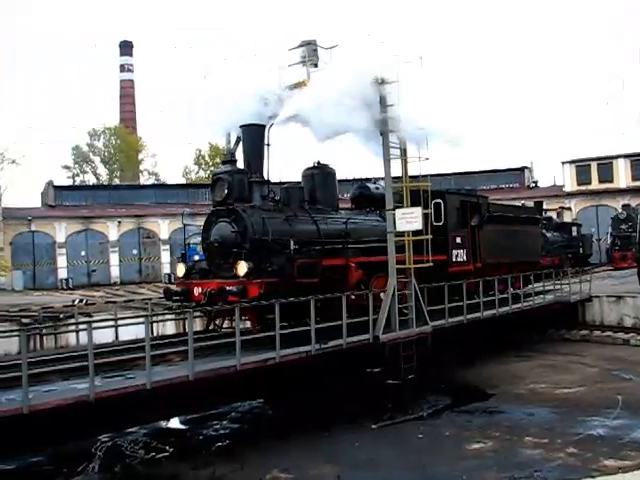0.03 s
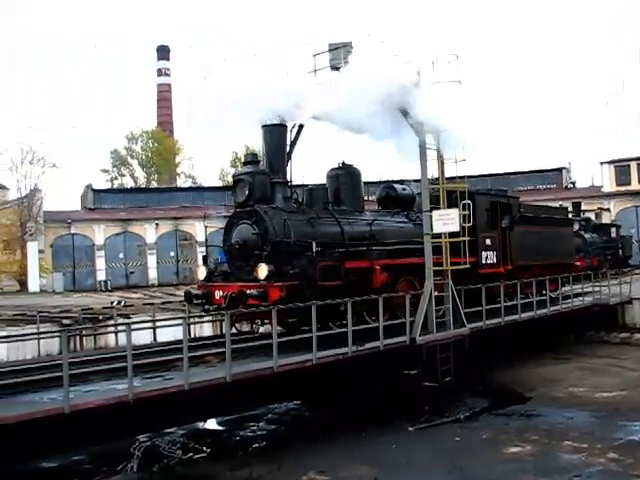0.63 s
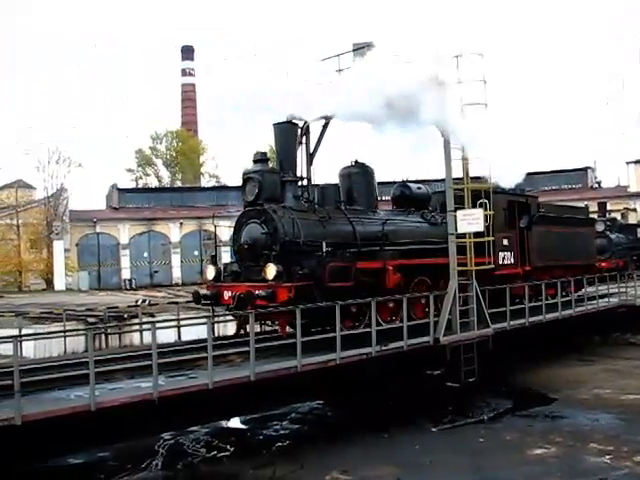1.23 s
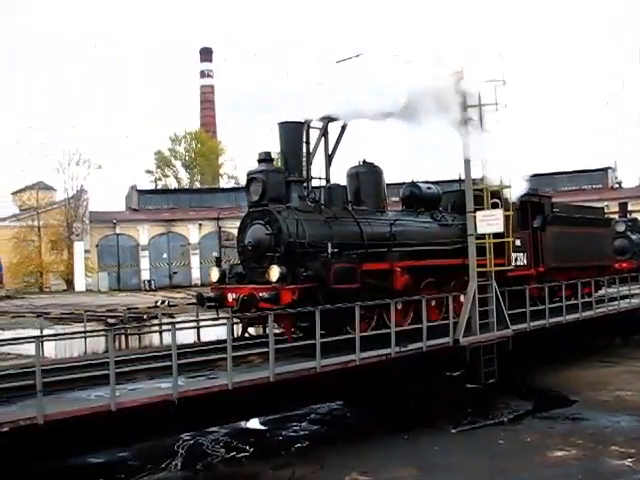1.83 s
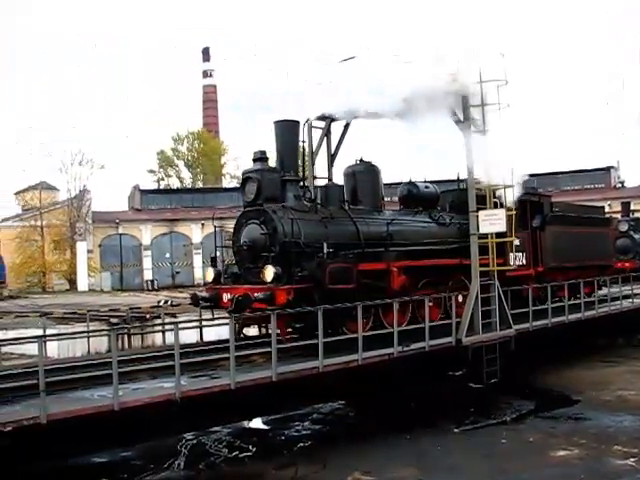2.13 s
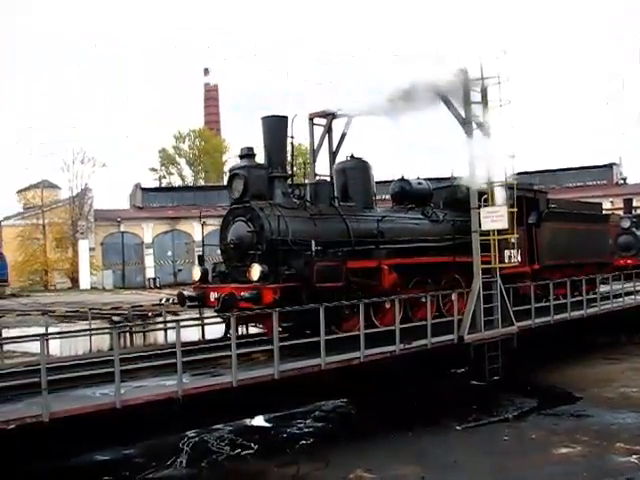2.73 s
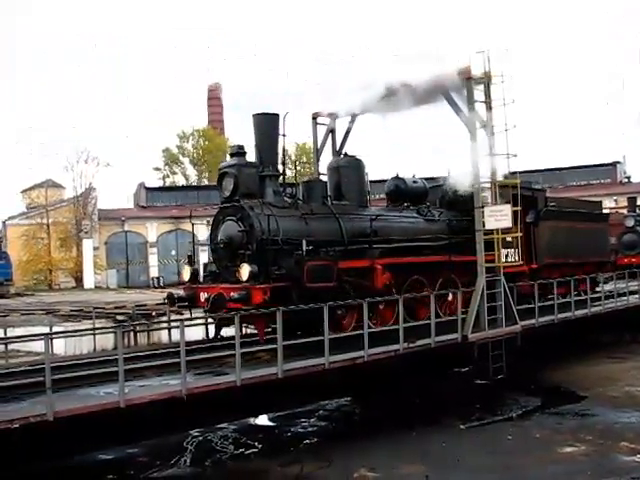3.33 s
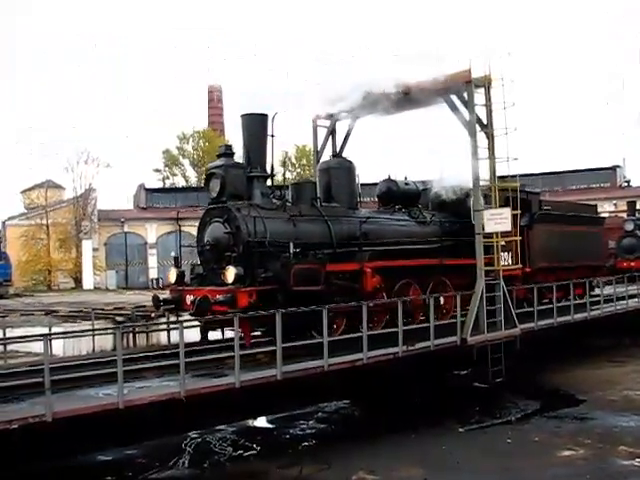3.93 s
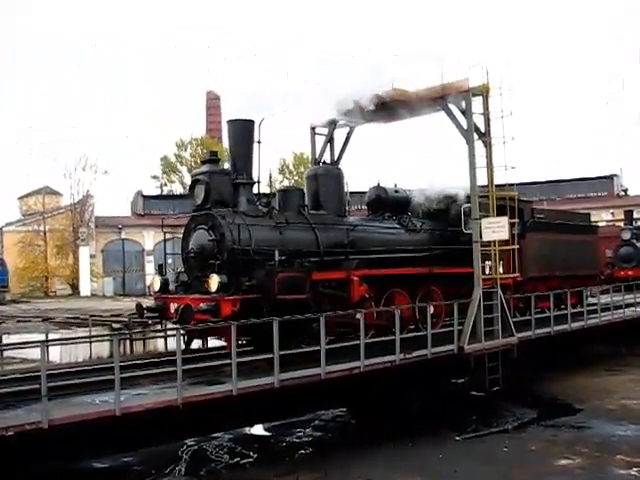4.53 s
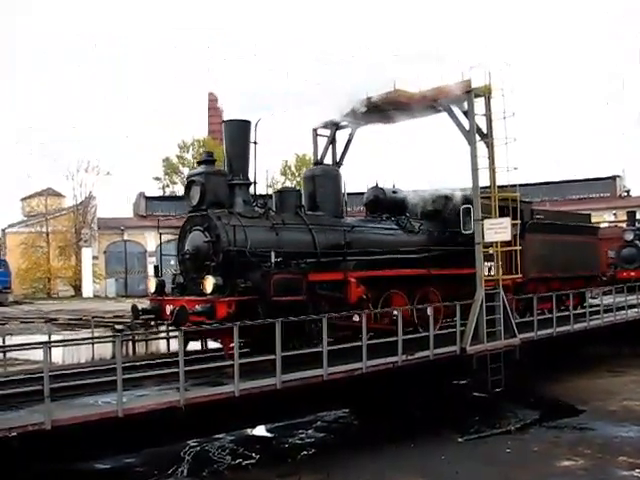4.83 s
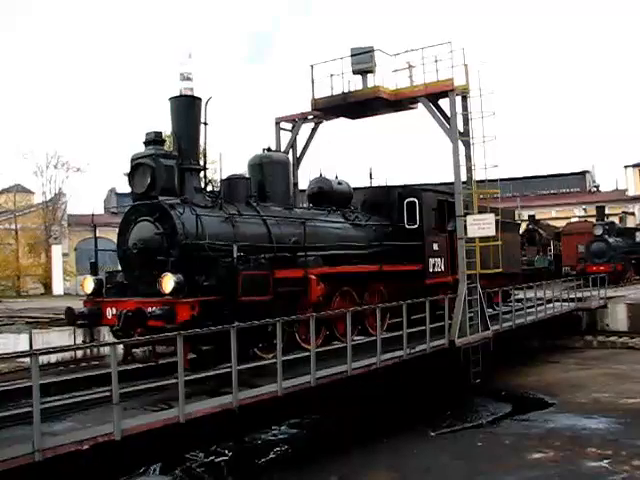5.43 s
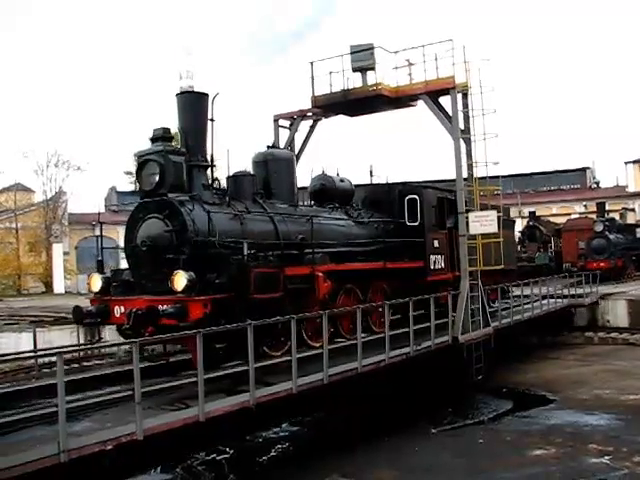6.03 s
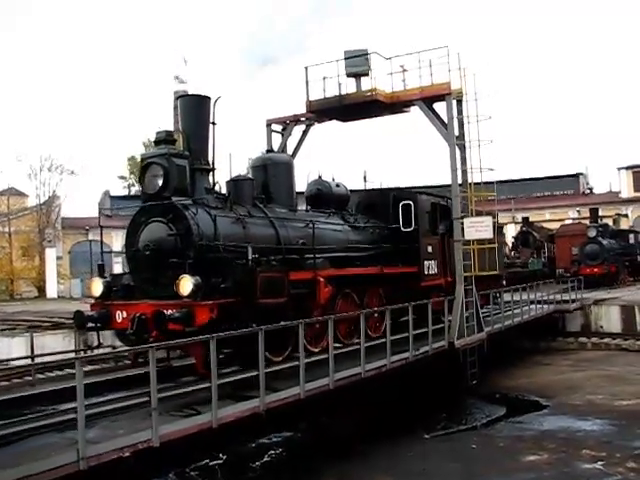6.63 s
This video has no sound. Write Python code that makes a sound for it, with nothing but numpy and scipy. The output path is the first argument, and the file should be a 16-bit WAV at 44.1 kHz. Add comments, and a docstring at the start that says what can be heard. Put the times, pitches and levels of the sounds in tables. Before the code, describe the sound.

A steam locomotive moves slowly outdoors, some thirty metres away, with a steady bright hiss and a low rumble throughout. Soft swells of steam open the scene. Loud blasts of wet steam, each about a third of a second long, come at 1.5, 2.4, 4.0, 4.9, 5.8 and 6.6 seconds. Most begin with a pop and trail off quickly, and the background dips under each, then recovers. Gentler swells fall between them. A faint breathy whistle, sinking slightly in pitch, appears around 1 second and again from 2.6 to 4.4 seconds. At about 5.3 seconds the sound cuts to silence for an instant. It returns much nearer, with stronger hiss and rumble, and the turntable girders give two low, wavering groans, at about 5.4 and 6.1 seconds. The sound ends just as the last blast starts.

```python
"""A steady hiss of leaking steam and a low rumble: a locomotive creeps onto a turntable some 30 m off.
Its open cylinder cocks blow in turn, each with an echo off the ground: the near ones weep, burst out
with a pop and drain; the far ones swell softly and whistle. The bridge groans under the wheels.
Gain control on the microphone pair ducks the hiss and rumble at every blast.
Late on the sound cuts out for a moment, and after that the engine is much nearer."""
import sys
import numpy as np
from scipy import signal
from scipy.fft import rfft, irfft
from scipy.io import wavfile
from scipy.ndimage import uniform_filter1d

SR = 44100
rng = np.random.default_rng(int(sys.argv[2]) if len(sys.argv) > 2 else 0)


def dump(signal):
    """Clip the signal to [-1, 1] and save it as 16-bit WAV at the path in sys.argv[1]."""
    limited = np.clip(np.atleast_2d(signal).T, -1, 1)
    pcm = np.round(limited * 32767).astype(np.int16)
    wavfile.write(sys.argv[1], SR, pcm)


N = 294588
T = np.arange(N) / SR
HZ = np.fft.rfftfreq(N, 1 / SR)

# blasts of the near cocks: t/s, level/dB, length/s, pressure fall/(dB/s), pop level/dB, opening time/s
BLASTS = [(1.456, -8.5, 0.34, 33, -24, .003), (2.4334, -7.5, 0.37, 40, -10, 0.0006),
          (3.952, -7, 0.33, 34, -13, 0.0008), (4.8888, -6.5, 0.34, 35.5, -11, .0012),
          (5.817, -3.5, 0.32, 43, -11, 0.0007), (6.624, -5, 0.43, 27, -10, .0005)]


def amp(db):
    """Decibels to gain."""
    return 10 ** (np.asarray(db) / 20)


def unit(x):
    """Scales to rms 1."""
    return x / np.sqrt(np.mean(x ** 2) + 1e-20)


def over_frequency(points):
    """A spectrum table at every frequency, joined up on a log axis."""
    hz, value = np.transpose(points)
    return np.interp(np.log(HZ + 1), np.log(hz + 1), value)


def over_time(points):
    """A curve table at every sample."""
    return np.interp(T, *np.transpose(points))


def bumps(modes):
    """Bell-shaped peaks and dips over frequency."""
    return sum(height / (1 + (2 * (HZ - hz) / width) ** 2) for hz, width, height in modes)


def swell(start, length, fade_s):
    """A smooth rise, a hold and a smooth fall, 0-1."""
    return np.sin(np.pi / 2 * np.clip(np.minimum(T - start, start + length - T) / fade_s, 0, 1))


def lag(x, seconds):
    """One-pole smoothing."""
    pole = np.exp(-1 / (seconds * SR))
    return signal.lfilter([1 - pole], [1, -pole], x)


def delayed(x, seconds):
    """Each channel heard later by a steady or moving delay."""
    return np.array([np.interp(T - seconds, T, side) for side in x])


def wander(rate_hz, size=4096):
    """Smooth random drift of rms 1, rolling off above the rate."""
    hz = np.fft.rfftfreq(size, T[-1] / size)
    slow = irfft(rfft(rng.standard_normal(size)) * np.exp(-(hz / rate_hz) ** 2) * (hz > 1), size)
    return np.interp(T, np.linspace(0, T[-1], size), unit(slow))


def fuzzy_tone(hz, width_hz):
    """A resonance driven by noise, at a steady or moving pitch."""
    drive = wander(width_hz) + 1j * wander(width_hz)
    phase = 2 * np.pi * np.cumsum(np.broadcast_to(hz, N)) / SR
    return unit((drive * np.exp(1j * phase)).real)


def turbulence(patchy_db, patch_hz, patch_s, size=512, hop=128):
    """Two white noises whose level drifts in shared patches of time and pitch."""
    spectra = signal.stft(rng.standard_normal((2, N)), nperseg=size, noverlap=size - hop)[2]
    bins = max(1, round(patch_hz * size / SR))
    frames = max(1, round(patch_s * SR / hop))
    patches = uniform_filter1d(rng.standard_normal(spectra.shape[1:]), bins, axis=0)
    patches = unit(uniform_filter1d(patches, frames, axis=1))
    noises = signal.istft(spectra * amp(patchy_db * patches), nperseg=size, noverlap=size - hop)[1]
    return unit(noises[:, :N])


def spits(per_s, size_db):
    """Sparse clicks of water drops torn out with the steam."""
    return amp(size_db) * (2 * rng.random(N) - 1) * (rng.random(N) < per_s / SR)


def at_microphones(colour_db, first, second):
    """Colours two unrelated noises and shares them between the microphone pair, at rms 1."""
    likeness = [(100, 1.0), (700, 0.96), (1600, 0.73), (2400, 0.84), (3000, 0.51), (6700, 0.95),
                (10000, 0.71), (11200, 0.58), (13300, 0.58)]  # coherence of left and right: f/Hz, likeness/0-1
    tilt = [(100, 0), (900, -1.1), (1500, 2), (2700, -2.5), (4000, 2.5), (5000, -4), (5900, -0.5),
            (7000, -3.5), (9500, -1.5), (10700, -7.5), (11800, -1)]  # balance of the pair: f/Hz, left over right/dB
    lead = [(100, 0.0), (1000, -0.13), (1900, -0.2), (2700, 0.3), (3200, -0.4), (3900, -0.2), (4500, -1.15),
            (5300, 1), (6500, 0.56), (8800, 0.99), (10000, 0.2), (11300, 1.5), (13200, 0.3)]  # phase across the pair: f/Hz, lead of the left/rad
    housing = [(7350, 800, -1), (10420, 1100, 4.5), (11100, 400, -1.5)]  # resonances of the microphone housing: f/Hz, width/Hz, lift/dB
    same = np.clip(over_frequency(likeness), 0, 1)
    tilt_db = over_frequency(tilt)
    left = rfft(first)
    right = (same * left + np.sqrt(1 - same ** 2) * rfft(second)) * np.exp(-1j * over_frequency(lead))
    pair = np.array([left * amp(tilt_db / 2), right * amp(-tilt_db / 2)])
    return unit(irfft(pair * amp(colour_db + bumps(housing)), N))


def nearness(reference_m=24):
    """Gain of the leak and the rumble: one over the distance, 1 at the reference."""
    distance = [(0, 29), (5.26, 22.4), (5.39, 9), (6.68, 15)]  # from engine to microphones: t/s, distance/m
    return reference_m / over_time(distance)


def ground_echo(x):
    """The bounce off the ground lags further behind as the engine comes nearer."""
    echo = [(0, 2.99), (1.65, 3.125), (3.5, 3.185), (5.26, 3.31), (5.39, 3.56), (6.68, 3.64)]  # lag behind the direct sound: t/s, delay/ms
    return delayed(x, over_time(echo) / 1000)


def beamed(steam, front_pan_db=0.7):
    """The colour and direction of the steam shift as the microphones face more of the engine's front."""
    aspect = [(0, 0.2), (3, 0.3), (5.26, 0.98), (5.4, 1), (6.68, 0.9)]  # swing toward the front of the engine: t/s, share/0-1
    beam = [(2760, 85, 0.38), (2974, 230, -0.36), (5400, 290, 0.37), (7050, 940, -0.45)]  # bands the jets beam forward or lose: f/Hz, width/Hz, signed share
    front = over_time(aspect)
    pan_db = front_pan_db * front
    coloured = steam + front * irfft(rfft(steam) * bumps(beam), N)
    return coloured * amp([pan_db / 2, -pan_db / 2])


def bridge(rumble_db=-35, upper_hz=288, upper_db=-4):
    """The wheels shake the turntable: a wide rumble, and girders that groan with two wavering tones."""
    colour = [(15, -20), (28, -7.5), (48, 2.5), (65, -1), (95, -2.5), (150, -2), (280, -2), (370, -5),
              (470, -9.5), (650, -5.5), (1200, -15.5), (3000, -52)]  # spectrum of the rumble: f/Hz, level/dB
    groans = [(.6, 5.8, 179.3, -50.5), (5.25, 0.67, 194, -32.5), (6.05, .75, 223.8, -32)]  # groans of the girders: t/s, length/s, f/Hz, level/dB
    rumble = at_microphones(over_frequency(colour), *rng.standard_normal((2, N)))
    upper = amp(upper_db) * fuzzy_tone(upper_hz, width_hz=28)
    girders = sum(amp(db) * swell(start, length, fade_s=.15) * (fuzzy_tone(hz, width_hz=8) + upper)
                  for start, length, hz, db in groans)
    return rumble * nearness() * amp(rumble_db + .5 * wander(rate_hz=7.1)) + girders


def leak(level_db=-21, spurt_at_s=3.32, spurt_s=0.076, spurt_db=2.4):
    """A thin, bright jet of steam that flutters a little and spurts once."""
    colour = [(100, -27), (600, -10), (1500, -4), (2300, -1.5), (3500, 0.5), (4800, 0.1), (6600, 0),
              (8200, -0.4), (9600, 1.5), (11300, -2), (13300, -6), (15200, -15.5)]  # spectrum of the leak: f/Hz, level/dB
    first, second = turbulence(patchy_db=1.34, patch_hz=700, patch_s=.04)
    hiss = at_microphones(over_frequency(colour), first + spits(per_s=87, size_db=8), second)
    lift_db = spurt_db * swell(spurt_at_s, spurt_s, fade_s=spurt_s / 2)
    return hiss * nearness() * amp(level_db + lift_db + .5 * wander(rate_hz=52))


def whistle(sag_hz_per_s=40):
    """The jet sings on the lip of a far cock now and then, sinking in pitch."""
    whistles = [(.75, 0.46, 1018, -43.5), (2.6, 0.89, 981, -41.5), (3.5, 0.93, 954, -43.5)]  # breathy notes: t/s, length/s, starting f/Hz, level/dB
    notes = np.zeros(N)
    for start, length, hz, db in whistles:
        tone = fuzzy_tone(hz - sag_hz_per_s * (T - start), width_hz=22)
        notes += amp(db) * swell(start, length, fade_s=0.11) * tone
    return notes


def soft_pressure(rise_s=0.053, weep_lead_s=0.12, weep_db=-19.5, drain_db=-14, drain_db_per_s=32):
    """The far cocks swell in turn; the near ones weep before each blast and drain after it."""
    far_strokes = [(-.15, -23, 4), (.33, -22, 26), (.95, -25.5, 10), (2.92, -20, 13), (3.55, -25.5, 1),
                   (5.3, -17.5, -0.5), (6.2, -25, 19)]  # strokes of the far cocks: t/s, level/dB, pressure fall/(dB/s)
    power = np.zeros(N)
    for start, db, fall in far_strokes:
        age = np.maximum(T - start, 0)
        until = min(blast[0] for blast in BLASTS if blast[0] > start)  # the next blast takes the steam
        power += (amp(db - fall * age) * (1 - np.exp(-age / rise_s)) * (T < until)) ** 2
    for start, db, length, *_ in BLASTS:
        weep = amp(weep_db) * swell(start - weep_lead_s, weep_lead_s + length, fade_s=0.041)
        since_shut = np.maximum(T - start - length, 0)
        drain = amp(drain_db - drain_db_per_s * since_shut) * np.clip((T - start) / length, 0, 1)
        power += amp(db) ** 2 * (weep ** 2 + drain ** 2)
    return np.sqrt(power)


def blast_pressure(crack=1.1, crack_s=0.0014, swell_db=7, swell_s=0.026, closing_db_per_s=190):
    """A near valve cracks open, the jet swells and sinks as the steam expands, then the valve shuts."""
    power = np.zeros(N)
    for start, db, length, fall, _, opening_s in BLASTS:
        age = np.maximum(T - start, 0)
        flow_db = db - swell_db * np.exp(-age / swell_s) - fall * age
        closing_db = closing_db_per_s * np.maximum(age - length, 0)
        snap = (1 - np.exp(-age / opening_s)) * (1 + crack * np.exp(-age / crack_s))
        power += (amp(flow_db - closing_db) * snap) ** 2
    return np.sqrt(power)


def pops(pulse_s=0.00023, echo_share=0.72):
    """The first slug of steam pops out as one pulse, rings the drain pipe and bounces off the ground."""
    pipe = [(250, -17, .04), (620, -22, .025), (950, -24.5, .025), (2050, -14, 0.011), (4220, -11, .01)]  # modes of the drain pipe: f/Hz, level/dB, t60/s
    direct = np.zeros(N)
    for start, _, _, _, pop_db, _ in BLASTS:
        age = np.maximum(T - start, 0)
        progress = age / pulse_s
        pulse = progress * (2 - progress) * np.exp(1 - progress)
        ring = sum(amp(db - 60 * np.minimum(age / t60, 2)) * np.sin(2 * np.pi * hz * age)
                   for hz, db, t60 in pipe)
        direct += amp(pop_db) * (pulse + ring)
    return direct + echo_share * ground_echo([direct])


def cocks(soft_echo=0.49, blast_echo=.35, dull_hz=5500, bite_hz=5400, bite_width_hz=2400, bite=0.99):
    """Wet steam roars from the cylinder cocks; the ground echo combs it with slowly sinking bands."""
    colour = [(100, -41), (400, -13.5), (700, -7.5), (1200, -5), (2000, -2), (3600, -1.06), (4300, -6),
              (6400, -7), (8000, -8), (9600, -7), (11300, -12), (13500, -17.5), (15200, -28.5)]  # spectrum of the jet: f/Hz, level/dB
    cavity = [(490, 300, -6), (624, 45, 3), (1170, 200, -4), (2060, 310, 2), (2820, 200, -3),
              (3230, 220, 1), (4530, 220, 3.5), (6780, 470, 4)]  # resonances of the cavity under the cylinders: f/Hz, width/Hz, lift/dB
    frame = [(.0015, 0.11), (.00166, -0.048)]  # reflections from the engine's frame: delay/s, signed share
    first, second = turbulence(patchy_db=1.3, patch_hz=500, patch_s=0.038)
    wet = first + spits(per_s=50, size_db=21)
    jet = at_microphones(over_frequency(colour) + bumps(cavity), wet, second)
    spectrum = rfft(jet)
    dull = irfft(spectrum / (1 + (HZ / dull_hz) ** 4), N)  # rough surfaces scatter the treble away
    direct = jet + sum(share * delayed(dull, seconds) for seconds, share in frame)
    echo = ground_echo(dull)
    pressure = blast_pressure()
    treble = irfft(spectrum * bumps([(bite_hz, bite_width_hz, bite)]), N)
    edge = treble * pressure / pressure.max()  # high pressure is brighter
    blasts = pressure * unit(direct + edge + blast_echo * echo)
    soft_steam = soft_pressure() * unit(direct + soft_echo * echo)
    return (blasts + soft_steam) * amp(0.34 * wander(rate_hz=58))


def scene():
    """Steam and wheels as they reach the microphone pair by the turntable."""
    return beamed(leak() + cocks()) + whistle() + pops() + bridge()


def gain_control(x, threshold_db=-22.5, squeeze=0.83, release_db_per_s=23, start_over_db=6):
    """Turns down fast by a share of the held excess over the threshold, creeps back up; starts ducked."""
    sense_s, attack_s = .004, .0018
    level_db = 10 * np.log10(lag((x ** 2).mean(0), sense_s) + 1e-12)
    release_db = release_db_per_s * T
    held_db = np.maximum.accumulate(level_db - threshold_db + release_db)
    over_db = np.maximum(np.maximum(held_db, start_over_db) - release_db, 0)
    smooth_over_db = start_over_db + lag(over_db - start_over_db, attack_s)
    return x * amp(-squeeze * smooth_over_db)


def record(dry, cut_from_s=5.2595, cut_to_s=5.3925, ceiling=.65, edge_hz=15700):
    """Behind the microphones: a brief cut to silence, gain control, soft overload and the band limit."""
    live = (T < cut_from_s) | (T > cut_to_s)
    limited = ceiling * np.tanh(gain_control(dry * live) / ceiling)
    low_pass = signal.firwin(511, edge_hz, window=("kaiser", 9), fs=SR)
    return signal.oaconvolve(limited, low_pass[None], "same")


dry = scene()
out = record(dry)
dump(out)
```